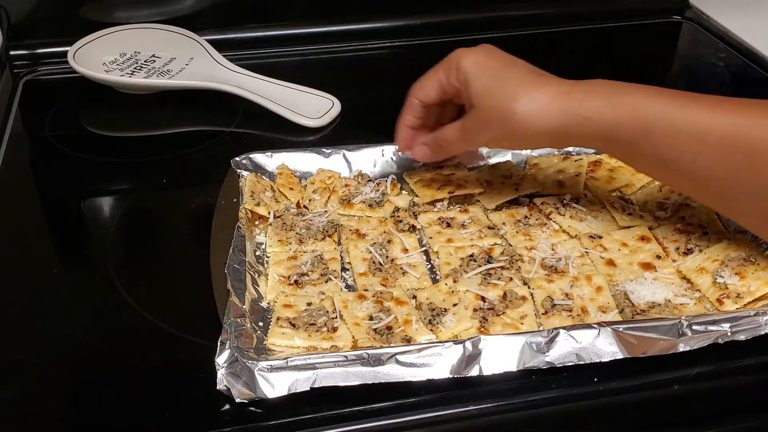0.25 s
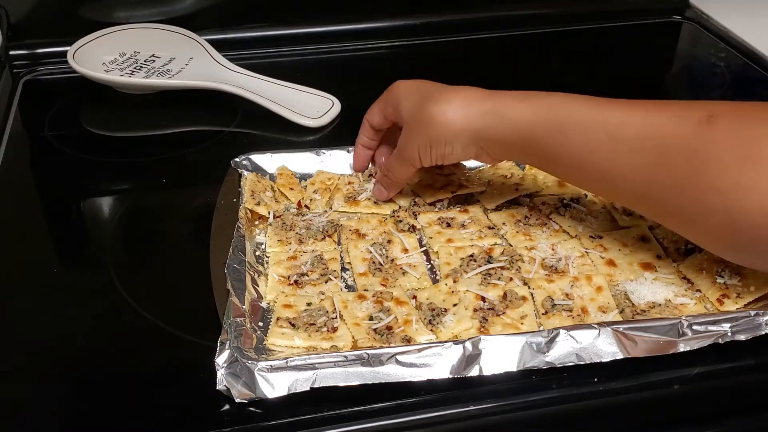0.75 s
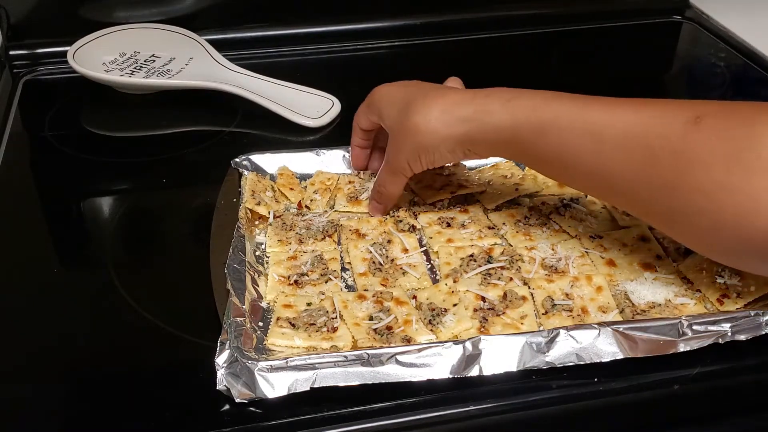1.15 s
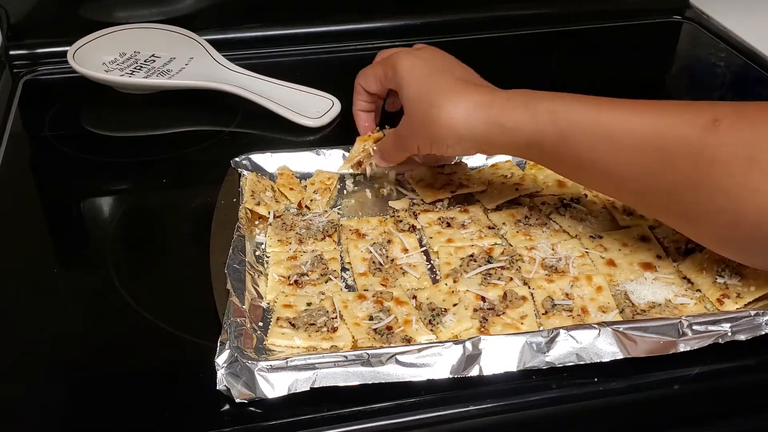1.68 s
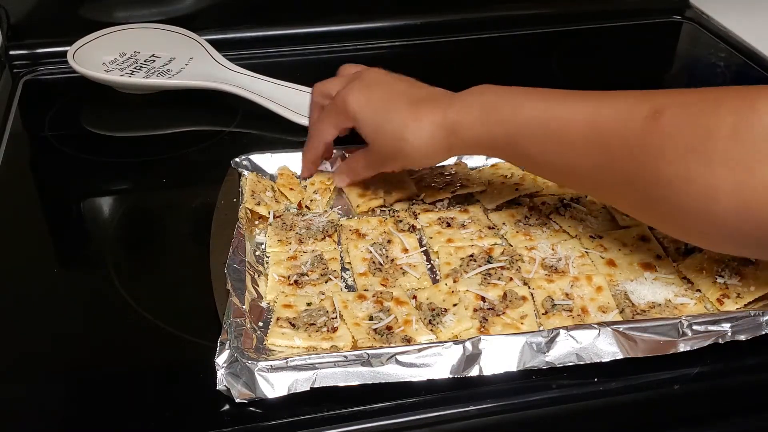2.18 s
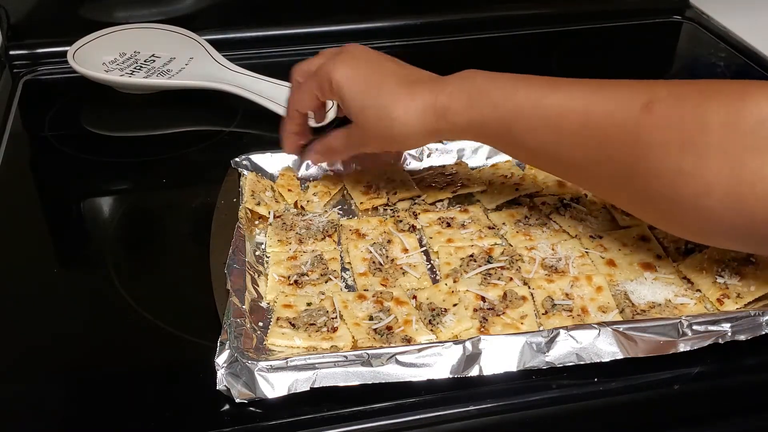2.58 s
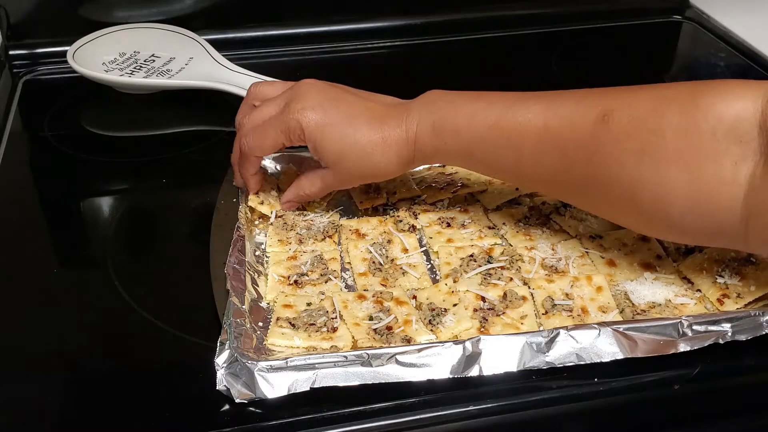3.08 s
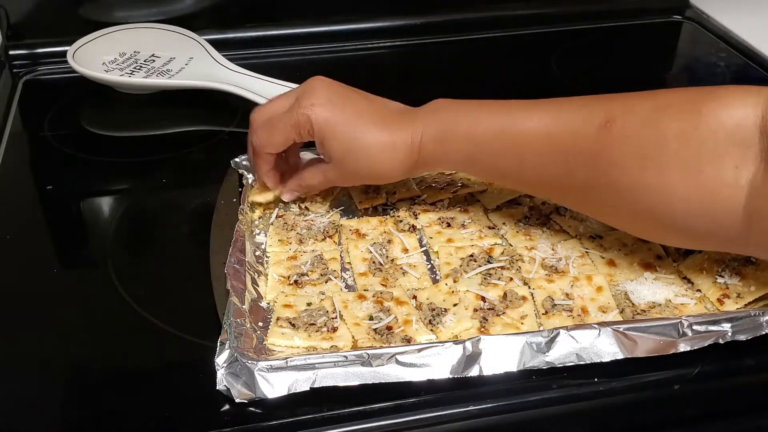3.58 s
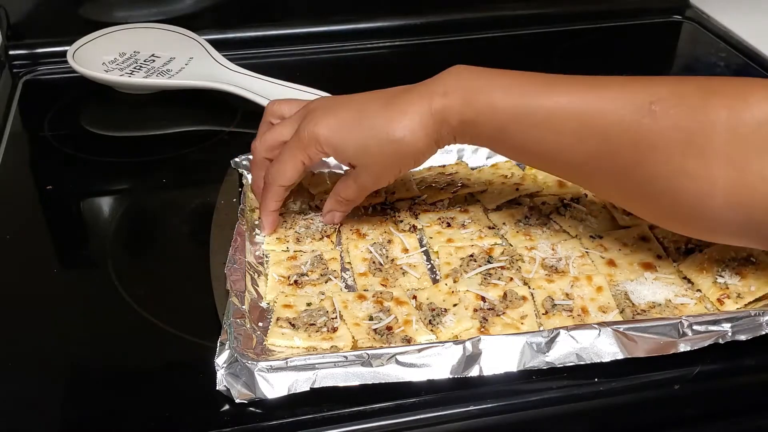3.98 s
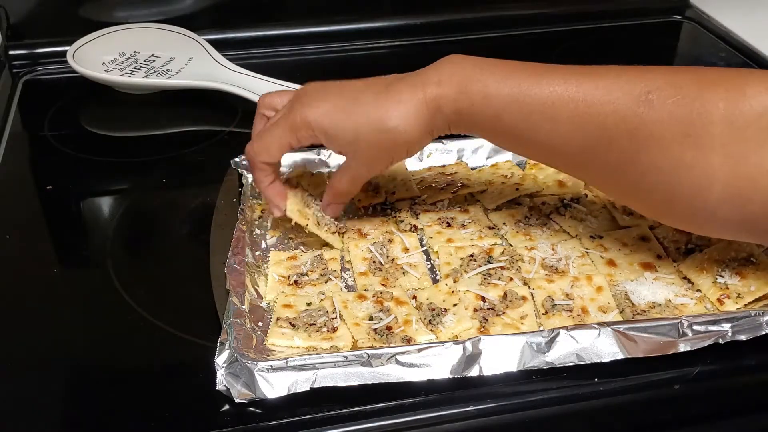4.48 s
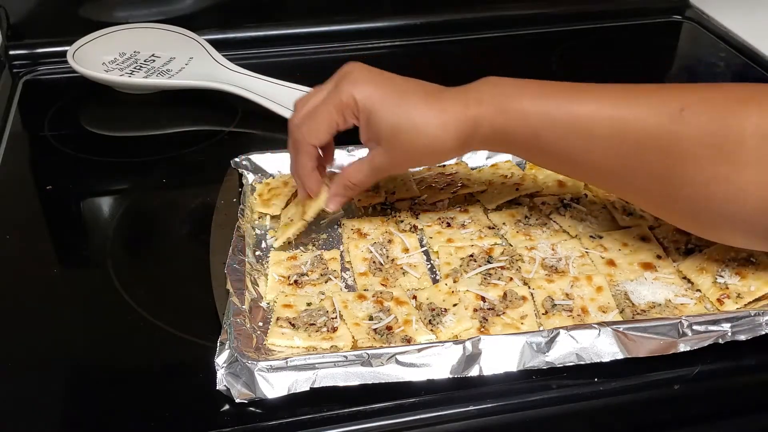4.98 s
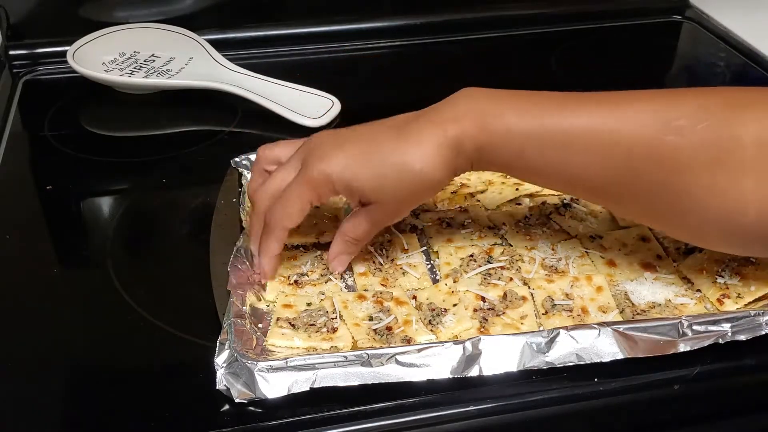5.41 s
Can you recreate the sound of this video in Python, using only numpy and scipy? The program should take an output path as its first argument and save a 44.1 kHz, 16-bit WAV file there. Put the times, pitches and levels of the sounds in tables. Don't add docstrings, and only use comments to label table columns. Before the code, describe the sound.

Close stereo pickup of foil being touched in a small kitchen: bright dry crackles, clicking dimples and light rustling, busiest early, sparser in the middle, with thin high ticks near the end. Low muffled thumps of the metal tray sit underneath. A quiet appliance hum, faint high whine and airy hiss continue unchanged.

```python
import sys
import numpy as np
from scipy import signal
from scipy.fft import rfft, irfft, next_fast_len
from scipy.io import wavfile
from scipy.ndimage import uniform_filter1d, minimum_filter1d, map_coordinates

SR = 44100
rng = np.random.default_rng(int(sys.argv[2]) if len(sys.argv) > 2 else 0)


def digitize_waveform(pressure):
    field = np.atleast_2d(pressure).T
    bounded = np.clip(field, -1, 1)
    quanta = np.round(bounded * 32767).astype(np.int16)
    wavfile.write(sys.argv[1], SR, quanta)


def natural_amplitude(level_db):
    exponent = np.asarray(level_db, float) / 20
    return 10 ** exponent


N = 249165


def unit(x):
    return x / np.sqrt(np.mean(x ** 2) + 1e-20)


def along(points, hz):
    f, value = np.transpose(points)
    return np.interp(np.log(hz + 1), np.log(f + 1), value)


def filtered(x, response):
    m = next_fast_len(N + SR // 2)
    return irfft(rfft(x, m) * response(np.fft.rfftfreq(m, 1 / SR)), m)[..., :N]


def wobble(rate):
    knots = rng.standard_normal(int(N * rate / SR) + 4)
    return map_coordinates(knots, [np.arange(N) * rate / SR])


def rush(gain):
    # f/Hz, correlation
    alike = [(60, 0.92), (290, 0.94), (640, 0.017), (1400, 0), (3000, 0.077)]

    def mid_side_gain(hz):
        turn = np.arccos(np.clip(along(alike, hz), -1, 1)) / 2
        return gain(hz) * [np.cos(turn), np.sin(turn)]

    mid, side = filtered(rng.standard_normal((2, N)), mid_side_gain)
    return unit(np.array([mid + side, mid - side]))


def kitchen():
    # f/Hz, level/dB
    drone = [(15, -38), (25, -18), (59, -3), (161, -9), (229, 1.5), (285, -4), (641, -9.5), (1610, -30),
             (2550, -38.5), (2910, -33), (4490, -57), (5280, -30.5), (10700, -53), (12500, -52),
             (16000, -58)]
    # f/Hz, width/Hz, level/dB
    hum = [(57.8, 6.8, -66), (126.3, 9.2, -71.5), (159.1, 7.3, -69), (211, 3.2, -62), (234.3, 15.6, -65.5),
           (332, 27, -66.5), (419, 18.7, -68.5), (567, 12.5, -69), (632.5, 7.6, -71.5), (773, 125, -71.5),
           (880, 61, -75), (5200, 140, -86), (8650, 2100, -86), (12700, 830, -85)]
    # f/Hz, rms level/dB
    whine_hz, whine_db = (2832, -89)

    def resonances(f):
        power = sum(natural_amplitude(db) ** 2 / w / (1 + ((f - centre) / w * 2) ** 4) for centre, w, db in hum)
        return np.sqrt(power)

    hum_rms = np.sqrt(sum(natural_amplitude(db) ** 2 for _, _, db in hum))
    whine_level = natural_amplitude(whine_db + 3 + 1.5 * wobble(7))
    phase = 2 * np.pi * whine_hz * np.arange(N) / SR + .25 * wobble(40) + [[0], [.7]]
    whine = whine_level * np.sin(phase)
    broad = natural_amplitude(-54 - 3) * rush(lambda hz: natural_amplitude(along(drone, hz)))
    return broad + hum_rms * rush(resonances) + whine


def touches():
    # t/s, peak/dB, dull part/dB, bright part/dB, fade/dB per 10 ms
    buckles = [(0.0024, -30, -13.5, -8.5, 3.5), (0.3835, -23, -12.5, -9, 1.5), (0.401, -38.5, -8, 6, 6),
               (0.533, -23.5, -14.5, -4.5, 4.5), (0.6419, -28, -17.5, -8, 7),
               (0.7294, -28.5, -12.5, -15, 8), (0.7567, -23, -13.5, -4, 10.5), (0.883, -29, -13.5, -6, 5.5),
               (1.1221, -32, -27, -8, 9), (1.2251, -38, -11, 0.5, 2.5), (1.2845, -28, -12, -4, 8.5),
               (1.737, -28, -18.5, -2.5, 2.5), (1.7442, -30.5, -15.5, -14, 0.5), (1.7599, -32, -16, -5, 22),
               (2.197, -28.5, -15.5, -5.5, 2), (2.2709, -29.5, -15.5, -5, 5.5),
               (2.5569, -37.5, -18, -13, 4.5), (3.1956, -37, -12, -7.5, 2.5), (3.2345, -35, -6.5, -7, 5),
               (3.5944, -34.5, -10.5, -6, 2), (3.6189, -37, -13, -3, 14), (3.6362, -36.5, -7.5, -11, 10),
               (4.5189, -35, -16, -12, 0.1), (4.549, -29.5, -15, -3, 8.5)]
    # t/s, peak/dB, dull part/dB, bright part/dB
    taps = [(0.0967, -42, -12, -8), (0.5009, -39.5, -11, -13), (0.658, -38.5, -4, 0),
            (0.7486, -29, -12, -8), (0.9588, -36.5, -22, -12), (1.0023, -47, -8, 6),
            (1.0824, -50.5, -11, -20), (1.1368, -34, -15.5, -10), (1.3592, -41.5, -12.5, -8),
            (1.5814, -43.5, -17, -21), (1.6212, -45.5, -17, -4.5), (1.838, -40, -10, -8.5),
            (1.9258, -46, -22, -15), (2.2857, -42, -5, -6), (2.3627, -44.5, -17, -8.5),
            (2.8319, -45, -15, -4), (2.8868, -47, -2.5, 1.5), (2.908, -42, -11.5, -2),
            (2.93, -43, -11.5, -15), (3.1814, -49, -7.5, -2), (3.3525, -47.5, -7, -13),
            (4.266, -44, -14, 0.5), (4.3948, -49, -22, -9), (4.4345, -48, -38, -10),
            (5.0886, -49.5, -2, -10), (5.3575, -46.5, -6, -8), (5.38, -41, -7.5, -3.5),
            (5.418, -41.5, -16, 3), (5.453, -39, -13.5, -17), (5.5937, -43, -12.5, -4.5)]
    # t/s, peak/dB, dull part/dB, bright
    # part/dB
    more_taps = [(0.7245, -34, -10, -18), (1.7291, -44, -13, -21), (2.4667, -64, -18, 3),
                 (3.055, -60.5, -17, 4.5), (3.0777, -63.5, -22, 1), (3.4124, -60, -12, 1.5),
                 (3.5376, -54.5, -22, 3), (3.8548, -59.5, -12, -1), (3.9813, -56, -11, 1),
                 (4.0792, -56.5, -34, 9.5), (4.098, -71, -30, 9.5), (4.151, -61.5, -30, 9),
                 (4.365, -55, -19, 2.5), (4.649, -66, -18, 5), (4.7675, -65, 2, -19), (4.908, -58, -14, -8),
                 (4.946, -64, -13, 5), (4.9943, -67, -6, 10), (5.5196, -47, -8.5, -10)]
    firm = [(s, db, dull, bright, 6, fade) for s, db, dull, bright, fade in buckles]
    light = [(*row, 13, 2.5) for row in taps]
    faint = [(*row, 14.5, 1.5) for row in more_taps]
    return firm + light + faint


def rattle(creases, direct_db, early_db, early_t60, uneven_db):
    t = np.arange(SR // 4) / SR
    tail = natural_amplitude(-60 * t / 0.28)
    shimmer = natural_amplitude(early_db - 60 * t / early_t60)
    click = natural_amplitude(direct_db - 60 * t / 0.0013)
    onset = 1 - np.exp(-t / 0.0003)
    energy = np.abs(signal.fftconvolve(creases ** 2, ((tail + shimmer + click) * onset) ** 2))
    m = next_fast_len(len(energy))
    u = np.linspace(0, 1, m // 2 + 1)
    dents = 0
    for count in (40, 200):
        dents = dents + np.interp(u * count, np.arange(count + 1), rng.standard_normal(count + 1))
    shared = .27
    left, other = rng.standard_normal((2, m))
    pair = np.array([left, shared * left + np.sqrt(1 - shared ** 2) * other])
    noise = irfft(rfft(pair) * natural_amplitude(uneven_db * dents), m)
    return np.sqrt(energy) * unit(noise)[:, :len(energy)]


def foil():
    # f/Hz, level/dB
    foil_colour = [(530, -21), (900, -18), (1310, -15), (1580, -13), (2330, -8), (3740, 0.5), (7850, -3),
                   (8980, 0), (14800, -3), (15900, 4), (16500, -61)]
    # t/s, level/dB
    rustle = [(0.0, -34.5), (0.2, -104), (0.44, -75), (0.6, -52), (1.0, -56.5), (1.3, -69), (1.45, -68),
              (1.64, -58.5), (1.95, -83), (2.3, -88), (2.44, -65.5), (2.68, -78.5), (3.13, -66),
              (3.7, -77.5), (4.2, -65.5), (4.5, -62), (4.72, -71), (5.65, -92)]
    dull, body, bright = np.zeros((3, 2, N + SR))
    for s, db, dull_db, bright_db, first_db, fade_db in touches():
        when, size = rng.random((2, 60))
        creases = np.zeros(SR // 10)
        at = (when * len(creases)).astype(int)
        creases[at] = natural_amplitude(np.minimum(-3 * np.log(size), 8) - abs(fade_db) * when * 10)
        creases[0] = natural_amplitude(first_db)
        creases /= np.linalg.norm(creases)
        sound = rattle(creases, direct_db=17, early_db=4, early_t60=.04, uneven_db=2)
        sound *= natural_amplitude(db - 3.5)
        length = sound.shape[1]
        start = round((s + .001) * SR)
        span = slice(start, start + length)
        body[:, span] += sound
        dull[:, span] += sound * natural_amplitude(dull_db + 17)
        bright[:, span] += sound * natural_amplitude(bright_db + 1.5 - 40 * np.arange(length) / SR)
    slide_db = np.interp(np.arange(N) / SR, *np.transpose(rustle))
    clumps = natural_amplitude(3 * wobble(300) + 2.5 * wobble(25))
    grains = unit(rng.standard_normal((2, N)) * clumps)
    body[:, :N] += grains * natural_amplitude(slide_db + 5.5)
    bright[:, :N] += grains * natural_amplitude(slide_db - 3)

    def low(hz):
        return 1 / (1 + (hz / 2500) ** 6)

    def high(hz):
        return 1 / (1 + (7000 / (hz + 1)) ** 6)

    def colour(hz):
        return natural_amplitude(along(foil_colour, hz))

    near = filtered(dull[:, :N], lambda hz: colour(hz) * low(hz))
    near += filtered(body[:, :N], lambda hz: colour(hz) * (1 - low(hz)) * (1 - high(hz)))
    near += filtered(bright[:, :N], lambda hz: colour(hz) * high(hz))
    return near * natural_amplitude([[.6], [-.6]])


def tray():
    # t/s, peak/dB, pitch/Hz
    thumps = [(0.096, -55, 169), (0.399, -52, 148), (0.461, -49, 199), (0.539, -50, 155),
              (0.756, -50.5, 97), (1.24, -53, 56.5), (1.762, -51, 55.6), (2.267, -48, 198),
              (2.385, -52.5, 51.7), (3.201, -49, 181), (3.621, -53, 181), (3.919, -67, 60),
              (4.539, -48.5, 140), (5.092, -48, 146), (5.126, -49.5, 94), (5.378, -60, 151)]
    out = np.zeros(N + SR)
    t = np.arange(SR // 4) / SR
    puff_band = signal.butter(2, [80, 450], "band", fs=SR)
    for s, db, hz in thumps:
        puff = unit(signal.lfilter(*puff_band, rng.standard_normal(len(t))))
        ring = np.sin(2 * np.pi * hz * t) + 1.22 * puff
        shape = natural_amplitude(db - 3 - 60 * t / .2) * (1 - np.exp(-t / .003))
        out[round(s * SR):][:len(t)] += shape * ring
    return out[:N]


def snaps():
    # t/s, peak/dB, pitch/Hz, left over right/dB
    flips = [(0.4046, -17, 3960, -4), (0.41, -32, 3100, 0), (0.5375, -29, 5160, 15.5),
             (0.6428, -31, 3890, -8), (0.758, -23, 3700, 10), (0.8817, -20.5, 3520, 1.5),
             (1.0037, -27, 4950, 7), (1.122, -23, 4630, 9), (1.2266, -25, 6600, 19), (1.2844, -21, 3150, 2),
             (1.7404, -18, 2960, -2), (1.7597, -21, 4900, -17), (1.9269, -33, 3640, 2),
             (2.1994, -21.5, 6000, 7), (2.2727, -18, 3240, 8), (2.2854, -37, 3680, -8),
             (2.558, -33, 4160, -3), (3.1965, -25.5, 9500, -6), (3.232, -29, 3560, 1),
             (3.594, -28.5, 3600, 7), (3.6366, -21.5, 3480, -4), (4.081, -36, 9700, -15),
             (4.2652, -18.5, 9960, 0), (4.5484, -21.5, 9800, -7), (5.3813, -26, 6360, 0),
             (5.4186, -23.5, 12700, -4), (5.451, -25.5, 9900, -4)]
    out = np.zeros((2, N + SR))
    t = np.arange(SR // 100) / SR
    for s, db, hz, pan_db in flips:
        ring = np.sin(2 * np.pi * (hz * t + rng.random((2, 1))))
        tick = .7 * rng.standard_normal((2, len(t)))
        shape = natural_amplitude(db + 1.5 - 60 * t / .0035) * (1 - np.exp(-t / .0004))
        pan = natural_amplitude(np.array([[pan_db / 2], [-pan_db / 2]]))
        out[:, round((s + .0005) * SR):][:, :len(t)] += shape * (ring + tick) * pan
    return filtered(out[:, :N], lambda hz: 1 / (1 + (2200 / (hz + 1)) ** 4) / (1 + (hz / 16000) ** 40))


def scene():
    top_hz, left_leads_s = 15950, 4 / 44100
    steady = filtered(foil(), lambda hz: hz < top_hz)
    mix = steady + snaps() + tray() + filtered(kitchen(), lambda hz: hz < top_hz)
    return filtered(mix, lambda hz: np.exp(1j * np.pi * hz * left_leads_s * np.array([[1], [-1]])))


def low_pass(x):
    return signal.sosfilt(signal.butter(12, 16990, fs=SR, output="sos"), x)


def record(dry):
    treble = filtered(dry, lambda hz: 1 / (1 + (2500 / (hz + 1)) ** 4))
    level = np.sqrt(np.abs(uniform_filter1d(np.mean(treble ** 2, 0), size=88)) + 1e-14)
    coming = -minimum_filter1d(-level, size=600, origin=-299)
    jump_db = np.log10(coming / level) * 20
    lost = uniform_filter1d(np.clip(jump_db / 8 - 2.65, 0, 1), size=40)
    return low_pass(dry - lost * treble)


dry = scene()
out = record(dry)
digitize_waveform(out)
```